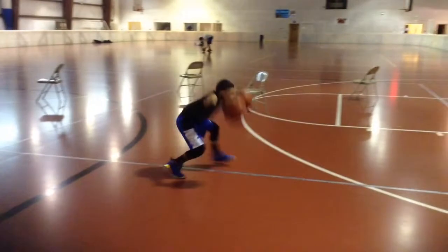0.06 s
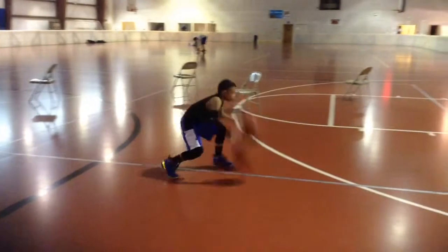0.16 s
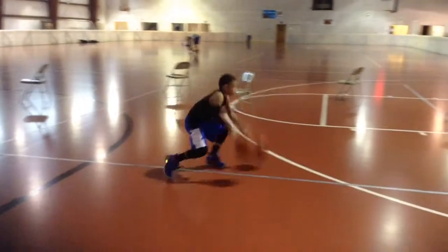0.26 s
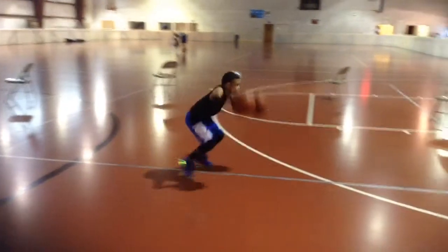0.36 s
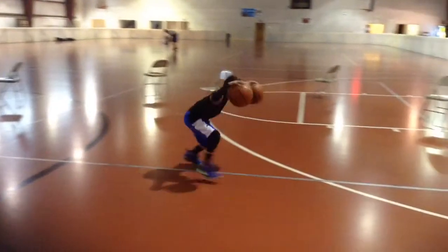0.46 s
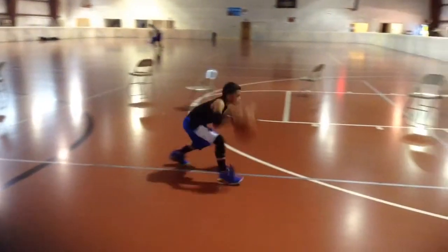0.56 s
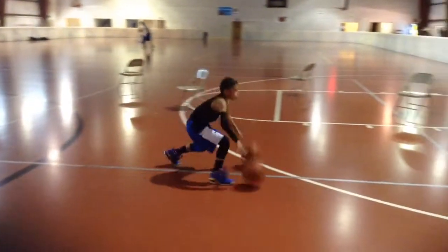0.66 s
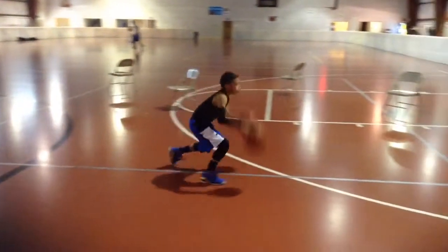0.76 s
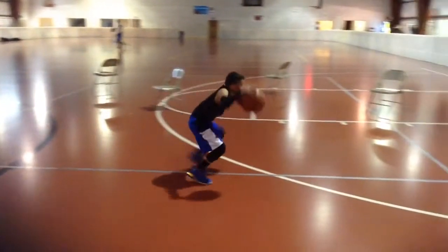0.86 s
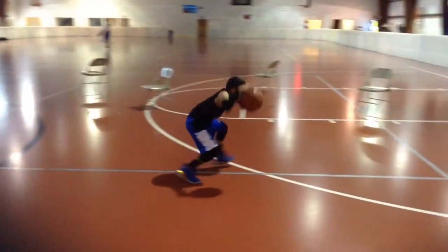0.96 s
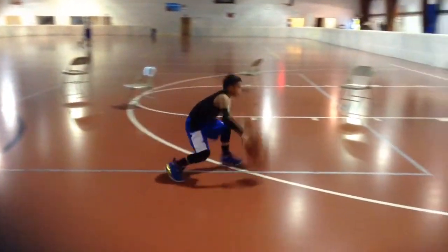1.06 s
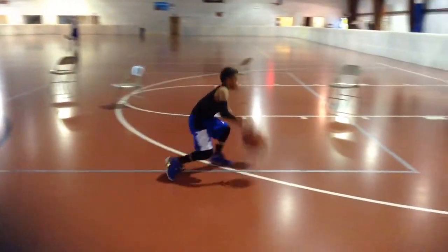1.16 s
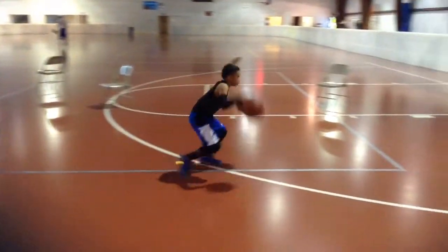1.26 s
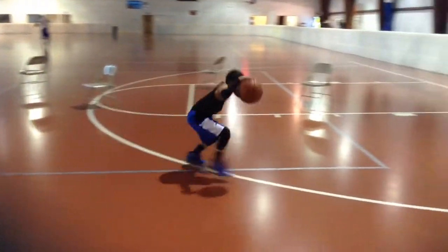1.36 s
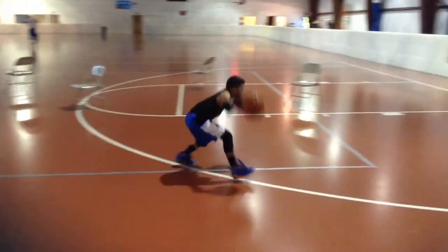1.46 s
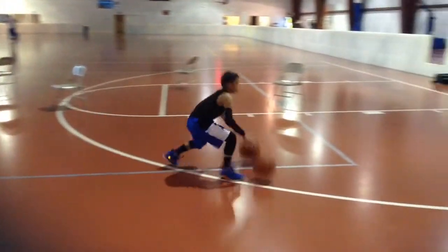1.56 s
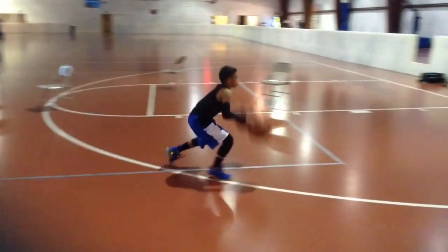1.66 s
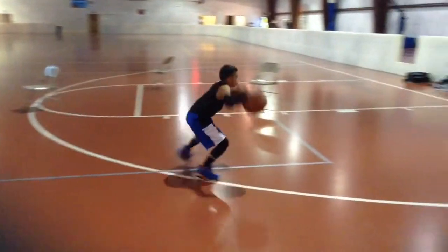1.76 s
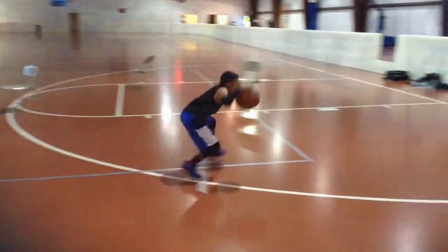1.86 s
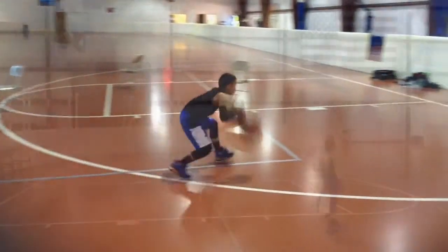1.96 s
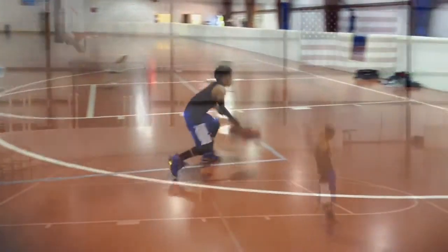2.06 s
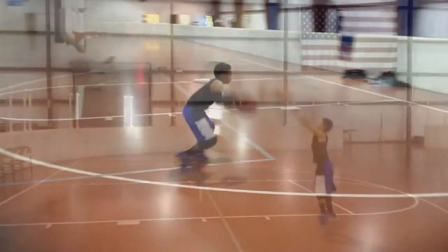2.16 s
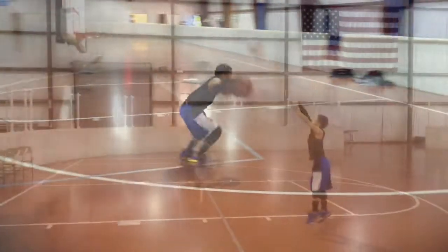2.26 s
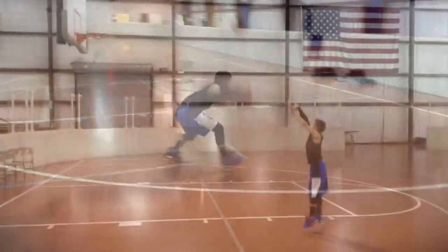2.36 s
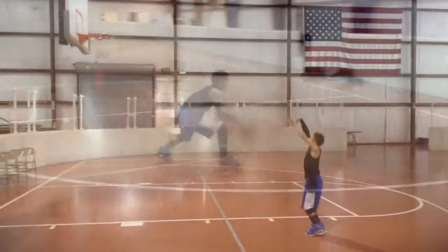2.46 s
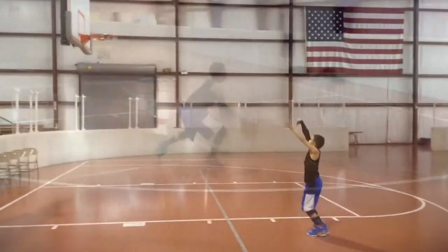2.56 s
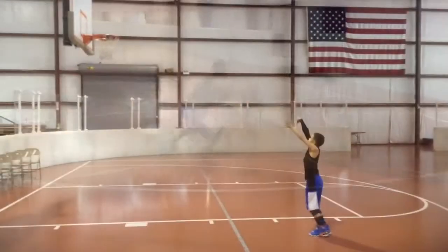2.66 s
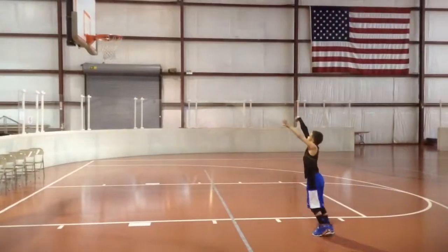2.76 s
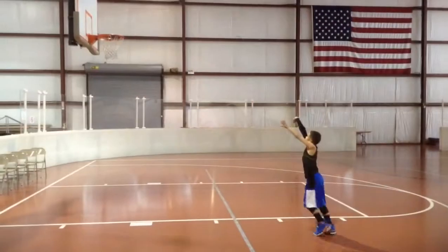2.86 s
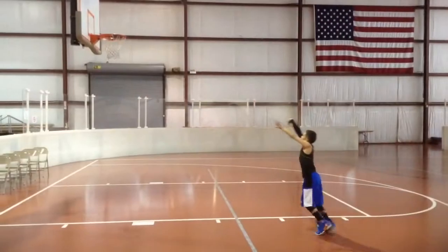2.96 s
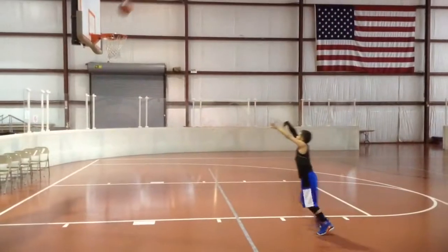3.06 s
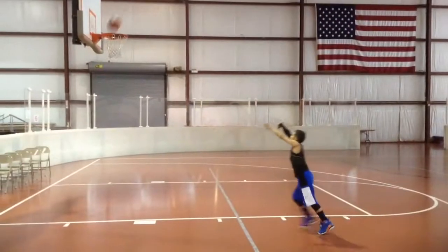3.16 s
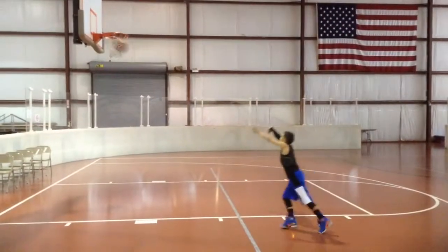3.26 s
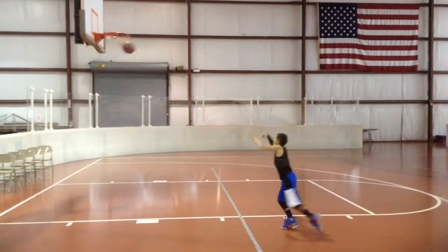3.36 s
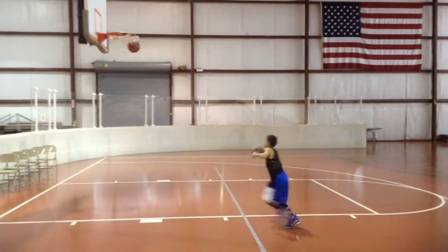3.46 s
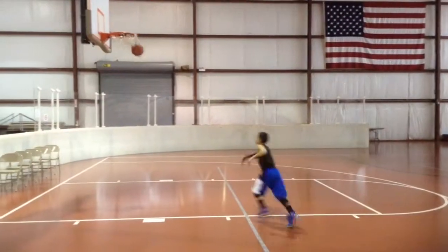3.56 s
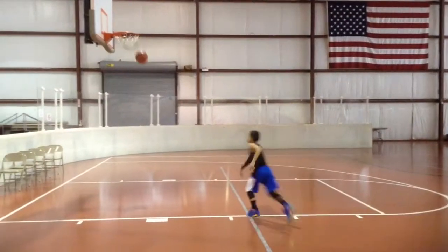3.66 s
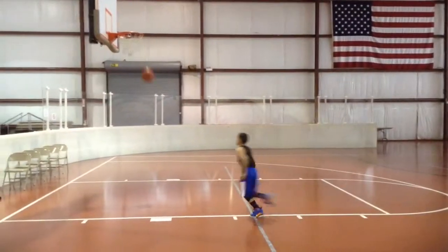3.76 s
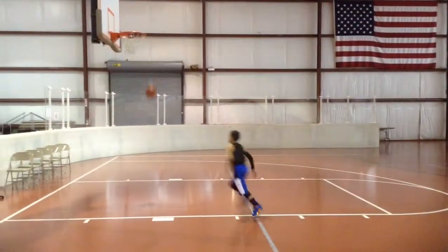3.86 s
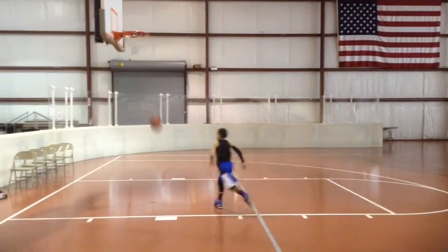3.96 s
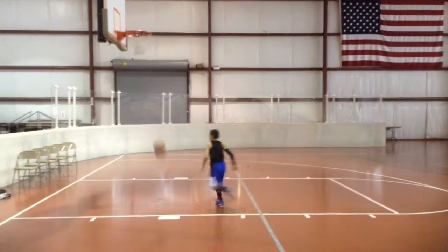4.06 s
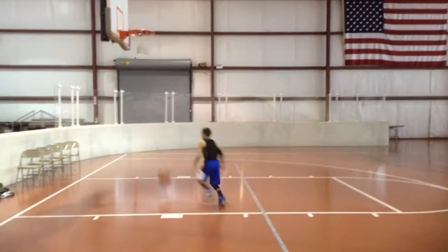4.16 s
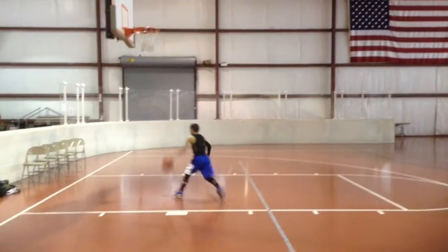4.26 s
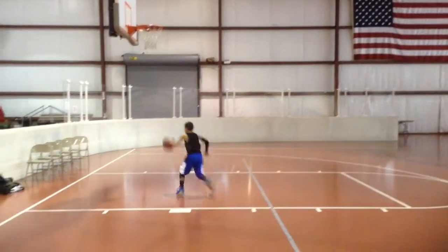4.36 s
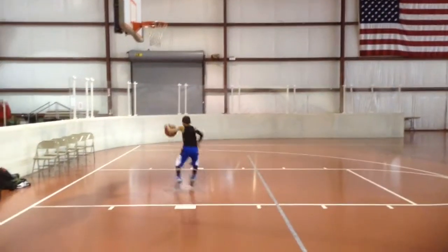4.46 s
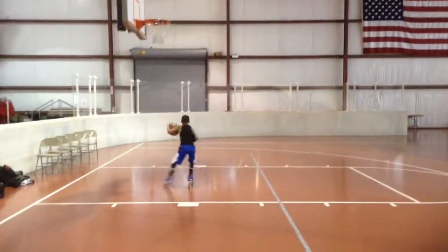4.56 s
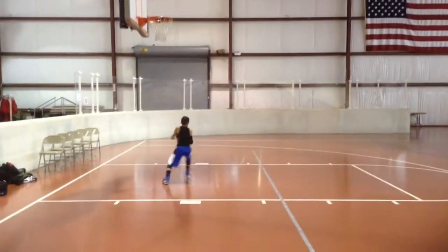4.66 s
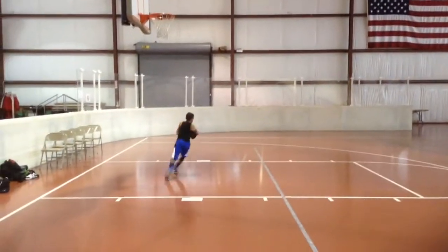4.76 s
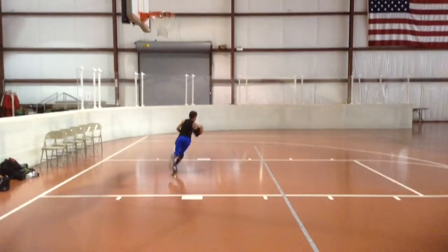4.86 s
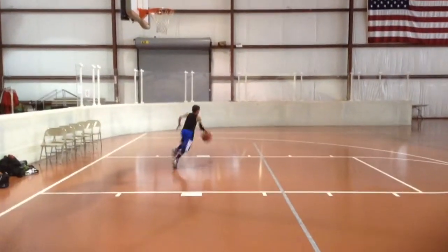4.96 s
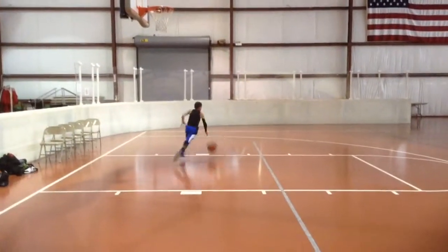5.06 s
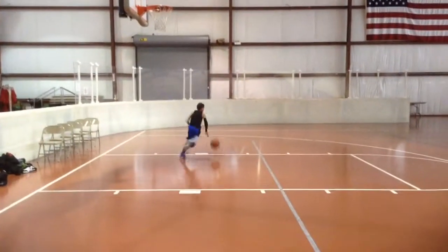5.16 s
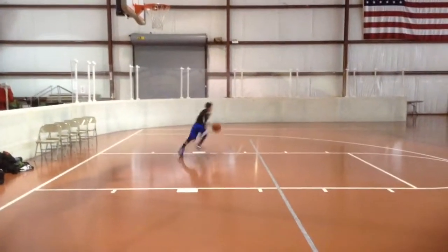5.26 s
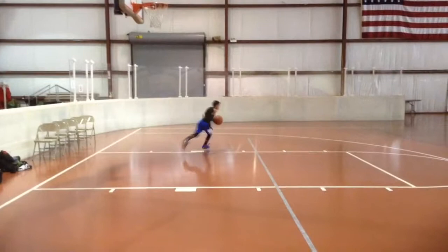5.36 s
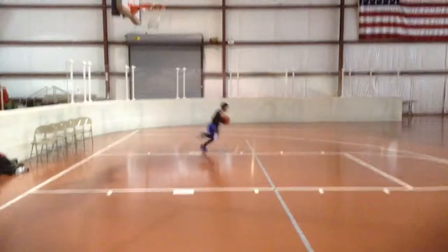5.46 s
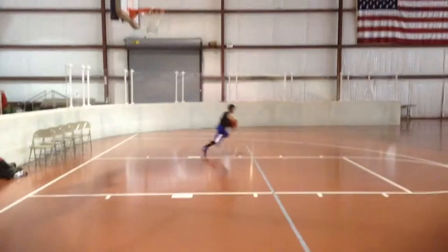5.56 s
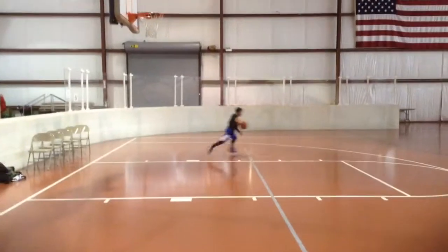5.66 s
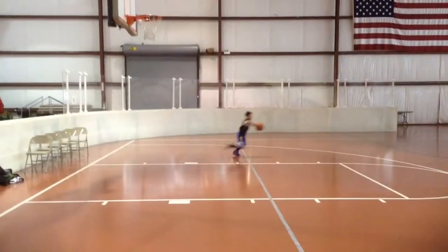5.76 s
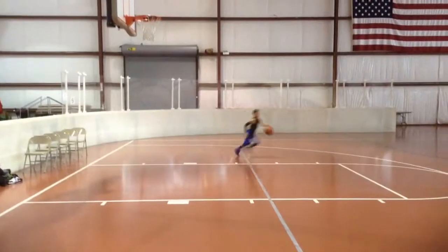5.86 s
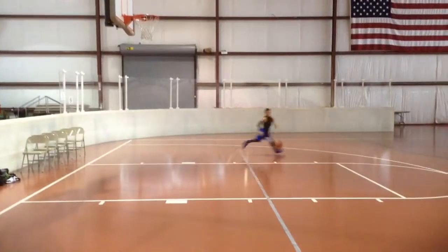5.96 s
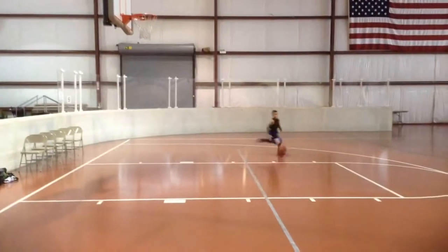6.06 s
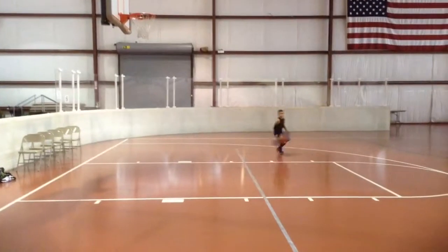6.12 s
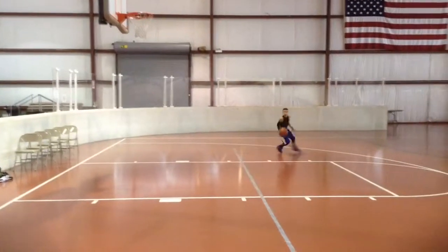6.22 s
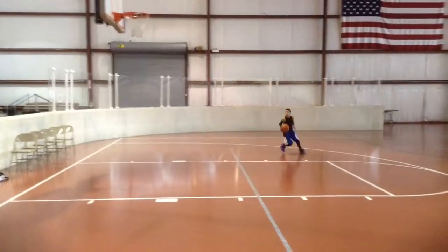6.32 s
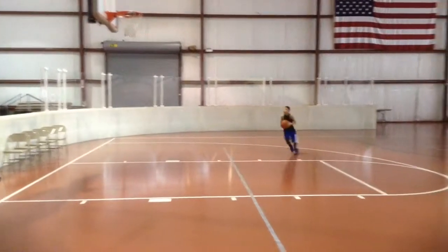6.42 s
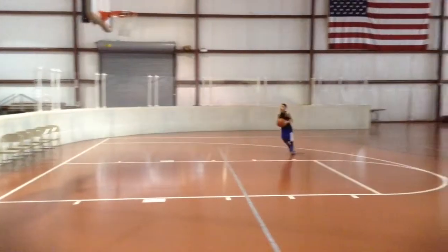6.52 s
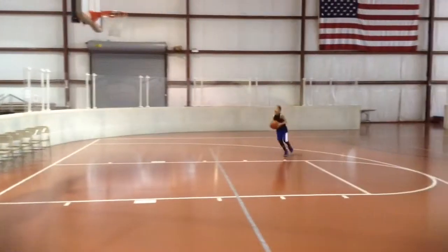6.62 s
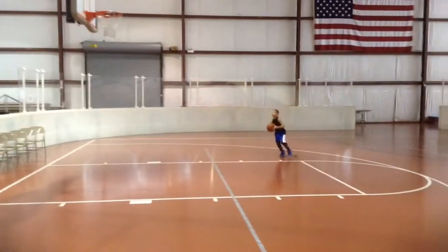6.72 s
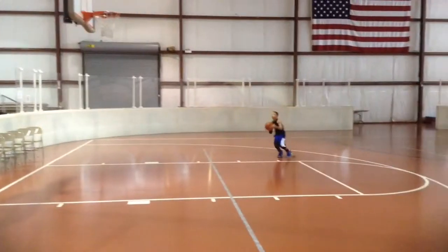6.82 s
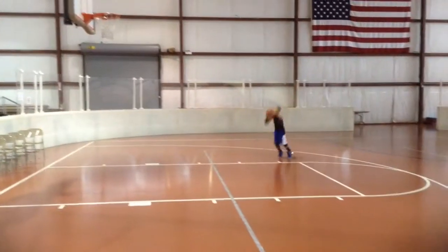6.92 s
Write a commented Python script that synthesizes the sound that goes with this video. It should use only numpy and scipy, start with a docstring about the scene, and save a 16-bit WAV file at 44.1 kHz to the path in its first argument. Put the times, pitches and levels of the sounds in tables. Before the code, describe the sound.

A basketball is dribbled steadily on a hard gym floor, about two bounces a second, each a sharp slap with a brief ring and a long echo. The dribble fades, and a shot rattles in the hoop and swishes softly through the net. Light shoe and hand taps and faint scuffs follow, with three slower bounces moving away from the microphone. Ventilation rumbles quietly throughout.

```python
"""A basketball is dribbled on the hard floor of a big steel-walled gym while the ventilation rumbles. Each
bounce is heard as two quick slaps, rings the ball briefly and sets off echoes and a long wash of sound in the
hall. Between two and three seconds in, this fades into play at the hoop: a shot rattles and swishes through the
net. Then shoes and hands tap, soles scuff, and three more bounces move away up the court."""
import sys
import numpy as np
from scipy import signal
from scipy.fft import rfft, irfft, next_fast_len
from scipy.io import wavfile
from scipy.ndimage import uniform_filter1d, minimum_filter1d

SR = 44100
rng = np.random.default_rng(int(sys.argv[2]) if len(sys.argv) > 2 else 0)


def wrap_up_sound(samples):
    """Save the sound to the file named by the first command line argument, as 16-bit audio."""
    columns = np.atleast_2d(samples).T
    # keep every value between -1 and 1, then stretch to whole-number steps
    tamed = np.clip(columns, -1, 1)
    steps = np.round(tamed * 32767).astype(np.int16)
    wavfile.write(sys.argv[1], SR, steps)


N = 308254

# The tone of the hall's answer to a knock. Each row: frequency in Hz, level in dB.
KNOCK_HALL_TONE = [(100, -2), (600, 5.5), (1300, 10), (2100, 6), (3200, -12.5), (5000, -6), (12000, -41)]


def amp(db):
    """Turn decibels into a number to multiply by."""
    return 10 ** (np.asarray(db) / 20)


def unit(x):
    """Scale a sound to an average (rms) level of 1."""
    return x / np.sqrt(np.mean(x ** 2) + 1e-20)


def along(points, hz):
    """Read between rows of (frequency, value), with all octaves equally wide."""
    frequencies, values = np.transpose(points)
    return np.interp(np.log(hz + 1), np.log(frequencies + 1), values)


def filtered(x, response):
    """Multiply each frequency in a sound by response(hz)."""
    size = next_fast_len(len(x) + SR // 10)
    return irfft(rfft(x, size) * response(np.fft.rfftfreq(size, 1 / SR)), size)[:len(x)]


def noise(tone, size):
    """Noise at level 1, shaped by rows of (Hz, dB)."""
    return unit(filtered(rng.standard_normal(size), lambda hz: amp(along(tone, hz))))


def fade(t, t60):
    """A smooth dying away. The fade time t60 is the seconds it takes to drop 60 dB."""
    return np.exp(-np.log(1000) * t / t60)


def add(track, start_s, sound):
    """Mix a sound into the track at a given time."""
    start = round(start_s * SR)
    part = sound[max(-start, 0):max(len(track) - start, 0)]
    track[max(start, 0):][:len(part)] += part


def ring(tones, t, scatter_db):
    """Fading tones, every other one flipped, at slightly new strengths for each blow."""
    chance = rng.standard_normal(len(tones))
    return sum((-1) ** k * amp(db + scatter_db * chance[k]) * np.sin(2 * np.pi * hz * t) * fade(t, t60)
               for k, (hz, db, t60) in enumerate(tones))


def burst(tone, db, t60):
    """A short puff of noise that dies away."""
    t = np.arange(SR // 6) / SR
    return amp(db) * noise(tone, len(t)) * fade(t, t60)


def ventilation(rush_db):
    """A steady rush of air, with two wavering fan tones and a faint hiss from the ducts."""
    # Each row: frequency in Hz, relative level in dB.
    rush_tone = [(15, -66), (25, -42.5), (123, -6.5), (180, 2), (256, -1), (317, -5), (405, -2.5),
                 (503, -8.5), (659, -10), (754, -14), (863, -12), (1130, -18), (4140, -32), (13600, -35.5),
                 (16000, -43)]
    # Each row: centre in Hz, width in Hz, level in dB.
    fans_and_duct = [(185, 2.4, -78), (471.7, 9.4, -58.5), (6300, 1000, -73.5)]
    out = amp(rush_db) * noise(rush_tone, N)
    for hz, width, db in fans_and_duct:
        band = filtered(rng.standard_normal(N), lambda f: np.exp(-((f - hz) / width) ** 2))
        out += amp(db) * unit(band)
    return out


def shell_thump(thump_db, t, deepening=0.45):
    """The ball's rubber shell flexes; only hard bounces bring out its deepest tone fully."""
    # Each row: frequency in Hz, level in dB, fade time in seconds.
    shell_tones = [(130.4, -14, 0.087), (219.5, -16, 0.082), (312.2, -22, 0.1), (416, -25.5, 0.19),
                   (182, -34.5, 0.056)]
    deepest = amp(deepening * thump_db) * ring(shell_tones[:1], t, scatter_db=-0.5)
    return amp(thump_db) * (ring(shell_tones[1:], t, scatter_db=3.5) - deepest)


def slap(thump_db, smack_db, crack_db, pitch):
    """The ball hits the floor, then sounds again, softer and duller, as it springs off."""
    # Each row of both: frequency in Hz, level in dB, fade time in seconds.
    smack_tones = [(605, -33, 0.057), (861, -18, 0.019), (1120, -11.5, 0.014), (1300, -15, 0.0089),
                   (1768, -18, 0.014), (2320, -10, 0.0049), (1220, -74, 0.02), (1440, -27, 0.03),
                   (3620, -36, 0.047), (5930, -47, 0.11), (7300, -55, 0.15)]  # the smack on the floor and the air ringing in the ball
    crack_tones = [(3660, -13.5, 0.0038), (5530, -5.5, 0.0011), (7250, -12, 0.003), (11300, -9.5, 0.0013)]  # the sharp snap of first touch
    # The ball's pebbled skin. Each row: frequency in Hz, level in dB.
    grit_tone = [(500, 4.5), (1500, 16.5), (2400, -25.5), (3100, 2.5), (4000, -6), (7000, -5), (9000, -3.5),
                 (12000, 4), (15500, -29)]
    t = np.arange(SR // 6) / SR
    grit = burst(grit_tone, db=-16, t60=0.013)
    crack = amp(crack_db) * (grit - ring(crack_tones, t, scatter_db=-4.0))
    smack = -amp(smack_db) * ring(smack_tones, t, scatter_db=2.5)
    thump = shell_thump(thump_db, t * pitch)
    dull_smack = signal.sosfilt(signal.butter(2, 1800, fs=SR, output="sos"), smack)
    out = thump + smack + crack
    on_floor_s = .0098 * np.exp(.12 * rng.standard_normal())
    add(out, on_floor_s, amp(-10) * thump + amp(-5) * dull_smack + amp(-19) * crack)
    return out


def first_reflections(db=-27, t60=0.36, rise_s=0.0023):
    """The floor and the low boards round the court give the bounce a short, dull body."""
    # The ball's tone in these echoes. Each row: frequency in Hz, level in dB.
    body_tone = [(60, -30), (130, 16.5), (220, 9), (265, -51), (312, 10), (360, -6), (411, 1), (500, 3.5),
                 (800, 0.5), (1130, 5), (1600, -8), (2200, -8), (4000, -10.5), (12000, -21)]
    t = np.arange(SR // 3) / SR
    return amp(db) * noise(body_tone, len(t)) * fade(t, t60) * (1 - np.exp(-t / rise_s))


def hall(tone, swell_s, flutter_db=3.0, flutter_hz=260, merge_s=0.27, gap_s=.014):
    """The gym answers a blow: echoes swell and merge into a wash whose high notes die first."""
    # Each row: frequency in Hz, fade time in seconds.
    fade_times = [(120, 2.93), (400, 2.2), (1200, 2.25), (2200, 2.14), (4000, 1.29), (7000, 0.53),
                  (13000, 0.42)]
    hz, t, bands = signal.stft(noise(tone, 3 * SR), SR, nperseg=256)
    wash = signal.istft(bands * fade(t, along(fade_times, hz)[:, None]), SR, nperseg=256)[1]
    t = np.arange(len(wash)) / SR
    lumps = np.interp(t * flutter_hz, np.arange(SR // 8), rng.standard_normal(SR // 8))
    flutter = amp(flutter_db * lumps * np.exp(-t / merge_s))
    swell = 1 - np.exp(-t / swell_s)
    return np.pad(wash * swell * flutter, (round(gap_s * SR), 0))


def ball_pings(wash):
    """The tones of the air inside the ball hang in the hall."""
    # Each row: frequency in Hz, width in Hz, boost in dB.
    pings = [(1153, 10, 5.5), (1404, 12, 4), (1497, 10, 2.5), (3560, 40, 3)]
    return filtered(wash, lambda f: amp(sum(db * np.exp(-((f - hz) / width) ** 2)
                                            for hz, width, db in pings)))


def girder_echoes(peak_s=0.14, spread=0.37, spiky_db=4):
    """The girders at the far end send back a crackling cluster of late echoes."""
    # Each row: frequency in Hz, level in dB.
    girder_tone = [(100, 10), (250, 21), (600, 17), (1400, -33), (2300, 0), (3200, 6), (5000, -7),
                   (8000, 0), (13000, -10), (15500, -10)]
    t = np.arange(1, SR // 2) / SR
    crackle = rng.standard_normal(len(t)) * amp(spiky_db * rng.standard_normal(len(t)))
    cluster = unit(filtered(crackle, lambda hz: amp(along(girder_tone, hz))))
    return cluster * np.exp(-.5 * (np.log(t / peak_s) / spread) ** 2)


def dribble(bounces, girders_db, pitch):
    """Double slaps weaken with distance; the hall and girders answer as loudly from anywhere."""
    # The player's path. Each row: time in seconds, distance in metres.
    path = [(2.6, 6.4), (4.26, 4.55), (5.18, 6.9), (6.12, 8.4)]
    # The hall's answer to a bounce. Each row: frequency in Hz, level in dB.
    wash_tone = [(60, -22), (125, 11), (220, 1), (400, -2.5), (550, -7.5), (800, -1), (1250, 4),
                 (2100, -1.5), (3100, -8.5), (4200, -10.5), (6500, -10), (9000, -10.5), (12000, -8),
                 (15500, -28)]
    out = np.zeros(N)
    for start, force_db, extra_smack_db, extra_crack_db, lag, second_db in bounces:
        metres = np.interp(start, *np.transpose(path))
        direct_db = force_db - 20 * np.log10(metres)
        thump_db = direct_db + 13.5
        smack_db = direct_db + 15 + extra_smack_db
        crack_db = direct_db + 13 + extra_crack_db
        wash_db = force_db + 0.11 * extra_smack_db - 33
        add(out, start, slap(thump_db, smack_db, crack_db, pitch))
        add(out, start + lag, amp(second_db) * slap(thump_db, smack_db, crack_db, pitch))
        add(out, start + lag / 2, amp((thump_db + smack_db) / 2) * first_reflections())
        add(out, start, amp(wash_db) * ball_pings(hall(wash_tone, swell_s=0.05)))
        add(out, start, amp(force_db + extra_crack_db + girders_db) * girder_echoes())
    return out


def knock(thud_db, clap_db, tick_db):
    """A soft hit that does not ring: a low thud, a clap and a short tick."""
    # Each row of all three: frequency in Hz, level in dB.
    thud_tone = [(40, -85), (120, 24), (400, 13.5), (800, 0), (3000, -61)]
    clap_tone = [(200, -6), (700, 14), (1300, 19), (2200, 13.5), (3200, -38), (12000, -23)]
    tick_tone = [(1000, -24), (3000, 9), (4500, 7), (8000, 2), (15000, -4)]
    return (burst(thud_tone, thud_db, t60=0.072)
            + burst(clap_tone, clap_db, t60=0.023)
            + burst(tick_tone, tick_db, t60=0.024))


def shoe_and_hand_taps(pair_s=.014, second_db=-2.5, hall_db=-15):
    """Heel then toe land, or one hand then the other meets the ball; the hall answers each pair."""
    # Each row: start in seconds, then thud, clap and tick levels in dB.
    taps = [(0.346, -26.5, -38, -55), (2.9812, -30.5, -32.5, -41), (3.893, -48, -42.5, -59),
            (4.050, -38, -44, -52), (4.714, -34.5, -35.5, -42), (5.782, -38, -43.5, -66)]
    out = np.zeros(N)
    for start, thud_db, clap_db, tick_db in taps:
        add(out, start, knock(thud_db, clap_db, tick_db))
        add(out, start + pair_s, amp(second_db) * knock(thud_db, clap_db, tick_db))
        add(out, start, amp(clap_db + hall_db) * hall(KNOCK_HALL_TONE, swell_s=0.007))
    return out


def wall_echoes(spray_db=-24, spray_t60=0.037):
    """A ribbed wall returns some slaps as one clear echo and a spray of weaker ones."""
    # Each row: start in seconds, level in dB.
    echoes = [(1.233, -9), (2.163, -16), (4.384, -17.5), (5.332, -20), (6.2675, -22.5)]
    # Each row: frequency in Hz, boost or cut in dB.
    wall_tone = [(100, -9), (700, -13), (2000, 7), (4000, -2.5), (12000, -26)]
    out, t = np.zeros(N), np.arange(SR // 6) / SR
    for start, db in echoes:
        bounce = slap(thump_db=2, smack_db=-5.0, crack_db=3.5, pitch=1)
        returns = amp(spray_db) * rng.standard_normal(len(t)) * fade(t, spray_t60)
        returns[0] = 1  # the clear echo
        echo = filtered(signal.fftconvolve(bounce, returns), lambda hz: amp(along(wall_tone, hz)))
        add(out, start, amp(db) * echo)
    return out


def hoop_rattle(thud_db=-6, tick_db=-19, hall_db=-14):
    """The ball knocks about in the hoop, and each knock fills the hall."""
    # Each row: start in seconds, clap level in dB.
    knocks = [(3.0369, -31.5), (3.085, -36), (3.185, -41), (3.267, -38.5), (3.373, -39.5)]
    out = np.zeros(N)
    for start, db in knocks:
        add(out, start, knock(db + thud_db, db, db + tick_db))
        add(out, start, amp(db + hall_db) * hall(KNOCK_HALL_TONE, swell_s=0.0056))
    return out


def swishes(width_octaves=0.66):
    """The net brushes the ball and soles scuff the floor: bright hiss that swells and dies."""
    # Each row: loudest moment in seconds, level in dB, half length in seconds, centre in Hz.
    rubs = [(3.34, -61.5, 0.075, 8000), (3.375, -48, 0.0056, 6350), (3.884, -63, .03, 11500),
            (4.707, -55, 0.046, 12400), (5.805, -61, 0.017, 13000)]
    out, t = np.zeros(N), np.arange(SR // 2) / SR
    middle = t.mean()
    for peak_s, db, half_length, centre_hz in rubs:
        hiss = filtered(rng.standard_normal(len(t)),
                        lambda hz: np.exp(-.5 * (np.log2((hz + 1) / centre_hz) / width_octaves) ** 2))
        swell = np.exp(-.5 * ((t - middle) / half_length) ** 2)
        add(out, peak_s - middle, amp(db) * unit(hiss) * swell)
    return out


def clicks():
    """Tiny, bright clicks with no echo."""
    # Each row: start in seconds, level in dB.
    moments = [(3.786, -47), (3.7983, -44), (6.4731, -45)]
    # Each row: frequency in Hz, level in dB.
    click_tone = [(4000, -25), (8000, -8), (11500, -1), (15000, -6)]
    out = np.zeros(N)
    for start, db in moments:
        add(out, start, burst(click_tone, db, t60=.015))
    return out


def small_microphone(play, cut_hz=95, leak_db=-25):
    """A small microphone passes little of the deep bass."""
    low_cut = signal.butter(4, cut_hz, "highpass", fs=SR, output="sos")
    return signal.sosfilt(low_cut, play) + amp(leak_db) * play


def scene(fade_start_s=2.11, fade_end_s=2.98):
    """The opening dribble fades into the shot and the run up the court, each over the ventilation."""
    # Each row: start in seconds, then force, extra smack and extra crack in dB,
    # then the second slap's delay in seconds and its level against the first in dB.
    bounces = [ (-.19, -1, -5, 0, .015, 0), (0.2558, 1.5, 1, 0, 0.027, -.5),
               (.72, -0.5, 3.5, 2.5, .0059, 2), (1.1685, 1, 0.5, -2.5, 0.013, 1),
               (1.638, 0, 1.5, 2.5, 0.00074, 2), (2.0785, 0, 4.5, 2.5, .016, -2),
               (2.5592, -4.5, 0.5, 2, .0059, 1), (4.263, -3.5, -9, 7, 0.0077, -2.5),
               (5.1797, -6, -1, -3.5, 0.0076, -4.5), (6.1211, -7.5, 0, 0.5, 0.0098, -2)]
    blend = np.interp(np.arange(N) / SR, (fade_start_s, fade_end_s), (0, 1))
    opening = dribble([row for row in bounces if row[0] < fade_end_s], girders_db=-54, pitch=1)
    run = dribble([row for row in bounces if row[0] >= fade_end_s], girders_db=-43.5, pitch=1.08)
    ball = (1 - blend) * opening + blend * run
    play = ball + wall_echoes() + shoe_and_hand_taps() + hoop_rattle() + swishes() + clicks()
    air = (1 - blend) * ventilation(rush_db=-43) + blend * ventilation(rush_db=-47)
    return (small_microphone(play) + air)[None]


def record(dry):
    """A fast limiter turns down the hardest slaps, and the very highest treble is cut."""
    ceiling, hold_samples, top_hz = .85, SR // 2000, 15400
    needed_gain = ceiling / np.maximum(np.abs(dry[0]), ceiling)
    held_gain = minimum_filter1d(needed_gain, 2 * hold_samples + 1)
    limited = dry[0] * uniform_filter1d(held_gain, hold_samples)
    return filtered(limited, lambda hz: np.clip((top_hz - hz) / 500 + .5, 0, 1))[None]


dry = scene()
out = record(dry)
wrap_up_sound(out)
```